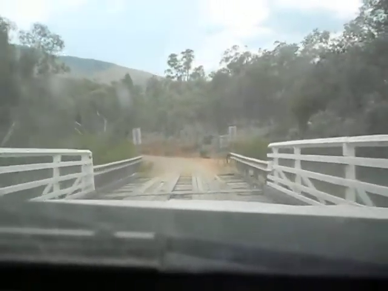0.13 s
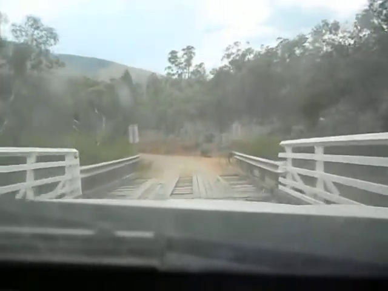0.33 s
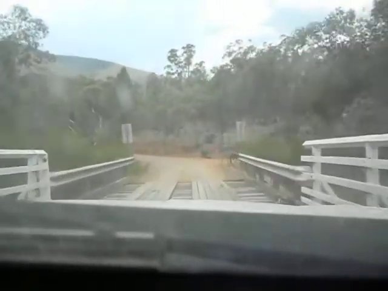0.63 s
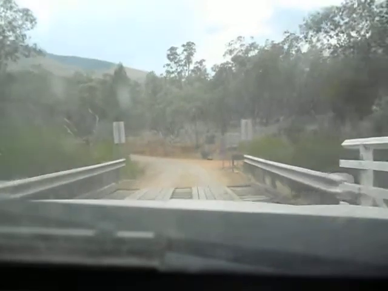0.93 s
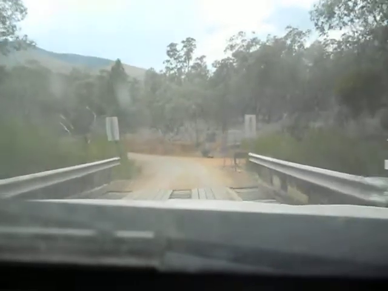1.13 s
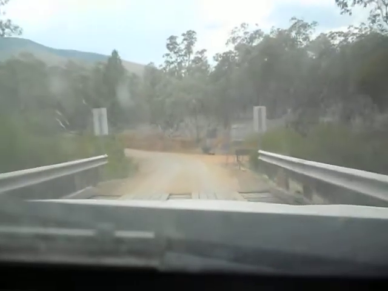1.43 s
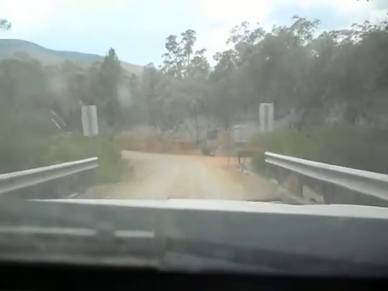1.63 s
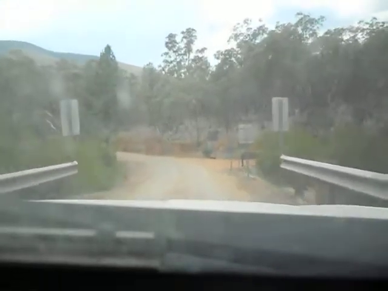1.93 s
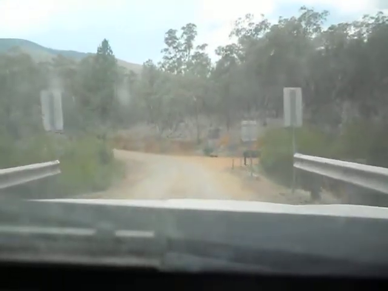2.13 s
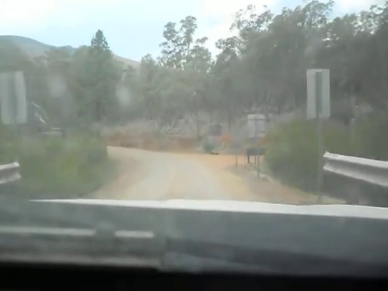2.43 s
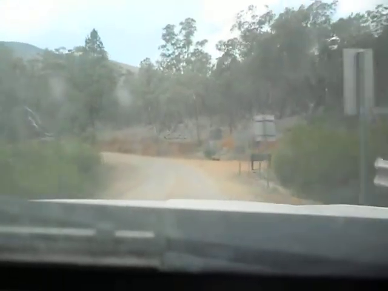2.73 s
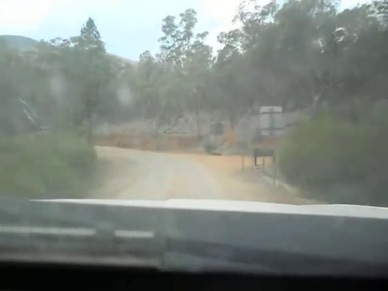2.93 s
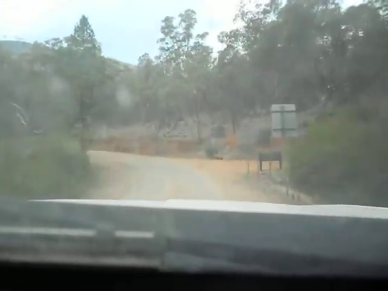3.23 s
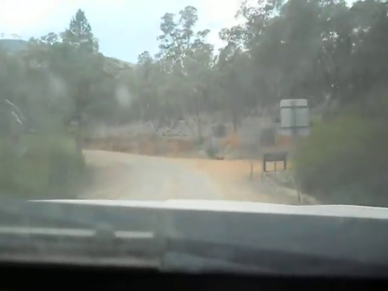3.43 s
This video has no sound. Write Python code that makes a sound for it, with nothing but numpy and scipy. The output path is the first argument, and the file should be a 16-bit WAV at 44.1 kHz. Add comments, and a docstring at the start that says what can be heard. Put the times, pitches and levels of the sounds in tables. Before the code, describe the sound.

Car tyres rumble dully across a wooden bridge above low engine hum and cabin boom. Two sharp plank clatters mark leaving it, then smoother dirt, a heavy jolt and jingling rattle, captured close inside the cabin.

```python
"""Tyres roar on the deck inside a car that rolls off a timber bridge onto a dirt road. Roar and grit are
filtered noise; the last planks crack, chatter and ring as decaying modes. Then a rut jolts the car: damped
thumps, and loose things rattle as contact runs and jingle as decaying sines. Beneath lie an engine hum of
firing harmonics and the slow boom of the cabin, two unsteady low sines."""
import sys
import numpy as np
from scipy import signal
from scipy.fft import rfft, irfft
from scipy.io import wavfile

SR = 44100
rng = np.random.default_rng(int(sys.argv[2]) if len(sys.argv) > 2 else 0)


def log_audio(samples):
    """Write samples as a 16-bit WAV file to the path given in sys.argv[1]."""
    # one column per channel
    frames = np.atleast_2d(samples).T
    # limit to full scale, then quantise
    limited = np.clip(frames, -1, 1)
    pcm = np.round(limited * 32767).astype(np.int16)
    wavfile.write(sys.argv[1], SR, pcm)


N = 157437
T = np.arange(N) / SR  # time, s

# All table levels are relative: each function may add its own trim.

# Tyre roar over time: time_s, level_db
ROAR_LEVEL = [(0, -21), (.15, -26), (.65, -24.5), (.95, -26.5), (1.35, -25.5), (1.72, -27), (1.92, -35),
              (2.12, -35), (2.42, -32), (2.58, -37), (2.82, -36.5), (2.92, -32), (3.0, -25), (3.1, -26),
              (3.2, -32.5), (3.3, -30.5), (3.57, -25.5)]
# Spectrum of the roar: frequency_hz, gain_db
ROAR_COLOUR = [(60, -14), (110, -3.5), (150, -12), (200, -14), (250, -11), (315, -12), (440, -20),
               (580, -19.5), (680, -23), (820, -21), (1030, -26.5), (1240, -26.5), (1550, -36.5),
               (3000, -44), (5000, -54.5), (10000, -70), (12000, -100)]
# Cabin resonances in the roar: frequency_hz, t60_s, level_db
ROAR_RESONANCES = [(184, 0.15, -5.5), (321, 0.085, -2), (477, 0.1, -6), (677.5, 0.086, -0.5),
                   (810.6, 0.087, -13.5), (1224, 0.077, -11.5)]
# Hiss of grit under the tyres over time: time_s, level_db
GRIT_LEVEL = [(0, -48.5), (.6, -49), (.95, -51.5), (1.45, -47.5), (1.8, -54.5), (2.05, -59.5), (2.4, -56),
              (2.88, -63), (2.97, -47), (3.2, -52), (3.35, -49), (3.43, -52.5), (3.57, -44.5)]
# Spectrum of the grit: frequency_hz, gain_db
GRIT_COLOUR = [(500, -21), (1500, 7), (3000, 8.5), (5500, 0), (8000, -2.5), (10200, -6), (10800, -50),
               (12000, -62)]
ROAR_RING_DB = -7.5
GRIT_PER_S, GRIT_SPREAD_DB = 9000, 2


def tyres(flutter_db=0.63, flutter_hz=40):
    """Broadband rolling noise: fluttering noise excites cabin resonances, and sparse impulses add grit."""
    roar = unit(colour(rng.standard_normal(N), ROAR_COLOUR))
    highpass = signal.butter(2, 120, "high", fs=SR, output="sos")
    roar = unit(signal.sosfilt(highpass, roar))
    resonance = ring(rng.standard_normal(N), ROAR_RESONANCES)
    roar = unit(roar + amp(ROAR_RING_DB) * resonance)
    roar_gain = amp(curve(ROAR_LEVEL) + flutter_db * wander(flutter_hz))

    # a few grains are much stronger than the rest
    grain_size = amp(GRIT_SPREAD_DB * np.minimum(rng.exponential(1, N), 4))
    grain_lands = rng.random(N) < GRIT_PER_S / SR
    grains = rng.standard_normal(N) * grain_size * grain_lands
    grit = unit(colour(grains, GRIT_COLOUR))
    return roar * roar_gain + grit * amp(curve(GRIT_LEVEL))


# Planks knocking under the wheels:
# start_s, chatter_db, chatter_length_s, brightness_db_per_octave, ring_db, crack_db
PLANK_KNOCKS = [(.249, -28.5, 0.12, -3.5, -33, -23), (.600, -19, 0.019, -3, -19, -12),
                (.609, -24, 0.011, -2.5, -20, -20), (1.179, -21.5, 0.029, -4.5, -21.5, -17),
                (1.506, -29, .006, -9, -31, -26), (1.5946, -16, .008, -4.5, -13.5, -5),
                (1.601, -11.5, 0.019, 1, -17, -3), (1.612, -13, 0.0071, -2.5, -37, -5.5),
                (1.619, -21, 0.0049, -6.5, -42, -7), (1.629, -38, 0.0091, -13, -24, -30),
                (1.656, -23, .018, 3.5, -41, -20), (1.732, -19.5, 0.026, 4.5, -20.5, -27),
                (1.764, -22.5, 0.023, 4, -17.5, -9), (1.783, -23, .017, 5, -25, -30),
                (2.184, -24, 0.0079, -3.5, -26, -23), (2.198, -15, 0.018, 0.5, -11.5, -13),
                (2.207, -28, 0.0095, 0.5, -9, -24), (2.223, -20, .011, -9, -20.5, -16),
                (2.246, -21, .009, -3.5, -27, -32), (2.258, -16.5, 0.0093, 2.5, -12.5, -11),
                (2.290, -23.5, 0.0072, 1, -18.5, -11), (2.344, -19.5, 0.018, 2.5, -33, -16),
                (2.361, -24, .008, 3.5, -22, -30), (2.380, -29, 0.045, 1, -19.5, -24)]
# Spectrum of a plank's crack and chatter: frequency_hz, gain_db
PLANK_COLOUR = [(70, -32), (150, -10), (250, -2.5), (400, 3), (560, 0.5), (820, -2.5), (1000, -0.5),
                (1300, -7), (1620, -11.5), (2150, -19.5), (2400, -22), (2720, -26), (3100, -29),
                (5000, -41), (10000, -51), (12000, -65)]
CHATTER_PER_S, CHATTER_FADE_S = 1300, 0.0067
DECK_T60_S, DECK_TAIL_DB = 0.35, -9.5


def planks():
    """Impact and modal response: each plank cracks down on its beam, chatters and sets the deck ringing."""
    knocks = np.zeros(N)
    for start, chatter_db, length, tilt, ring_db, crack_db in PLANK_KNOCKS:
        crack = colour(signal.unit_impulse(SR // 20), PLANK_COLOUR, tilt, tilt_top_hz=2600)
        add(knocks, start, amp(crack_db) * crack / np.abs(crack).max())
        run = contacts(length, CHATTER_PER_S, CHATTER_FADE_S)
        run = colour(run, PLANK_COLOUR, tilt, tilt_top_hz=2580)
        add(knocks, start, amp(chatter_db) * run)
        add(knocks, start, amp(ring_db) * deck_ring(tilt))
    return amp(-1) * (knocks + amp(DECK_TAIL_DB) * tail(knocks, DECK_T60_S))


# Ringing modes of the deck: frequency_hz, t60_s, level_db
DECK_MODES = [(262, 0.064, -14.5), (342, .07, -8.5), (408.7, .13, -7), (839, 0.059, -1),
              (1115, 0.039, -3.5), (1210, 0.036, -1.5), (1225, .05, -12), (1745, 0.082, -26),
              (1880, .09, -27), (2080, 0.029, -14), (2610, .12, -30), (3170, 0.097, -29)]
RING_RISE_S, RING_PIVOT_HZ = 0.0028, 1000


def deck_ring(tilt):
    """Modal superposition: one blow excites decaying sines, and its tilt in dB per octave weights them."""
    t = T[:SR // 4]
    tone = np.zeros(len(t))
    for hz, t60, db in DECK_MODES:
        gain = amp(db + tilt * np.log2(hz / RING_PIVOT_HZ))
        tone += gain * decay(t, t60) * np.sin(2 * np.pi * hz * t)
    return tone * np.minimum(t / RING_RISE_S, 1)


# Suspension thumps: start_s, level_db, pitch_hz, decay_s
THUMP_BLOWS = [(1.596, -10, 416.5, 0.004), (1.604, -24, 193, 0.019), (2.205, -16.5, 206, 0.013),
               (3.003, -12, 165, 0.012), (3.0264, -6.5, 400, 0.0048), (3.038, -19, 189, 0.032),
               (3.242, -26, 90, .03)]


def suspension():
    """Heavy damping: each blow to the body is a sine that dies along a Gaussian curve."""
    out = np.zeros(N)
    t = T[:SR // 5]
    for start, db, hz, decay_s in THUMP_BLOWS:
        add(out, start, amp(db) * np.sin(2 * np.pi * hz * t) * np.exp(-(t / decay_s) ** 2))
    return out


# Trim and small loose things clicking: start_s, level_db, length_s, brightness_db_per_octave
TICK_RUNS = [(.04, -43, 0.011, 12), (.63, -41.5, 0.025, 2), (.667, -24, 0.0022, 2.5),
             (.676, -28, 0.0018, 3), (.712, -34, 0.0031, 2), (1.062, -31.5, 0.0014, 0),
             (1.607, -46, .002, -3), (1.613, -45, .001, 3), (1.768, -29.5, 0.0058, 1),
             (2.21, -40, 0.0073, 4), (2.266, -36, 0.018, 0), (2.605, -45.5, 0.0091, 2),
             (2.683, -43, 0.0042, 1), (2.722, -46.5, 0.007, 4), (2.836, -46, 0.02, 2),
             (3.012, -34, 0.0044, -1), (3.036, -38, 0.056, 3.5), (3.066, -37.5, 0.016, 14),
             (3.095, -28, 0.03, 1.5), (3.13, -34, 0.038, 0.5), (3.173, -35.5, 0.015, 5),
             (3.243, -54, .01, 7), (3.362, -43.5, 0.011, 9)]
# Spectrum of the clicks: frequency_hz, gain_db
TICK_COLOUR = [(500, -40), (2000, 18.5), (3200, 13.5), (5500, 8), (8000, 6.5), (10000, -0.5), (11500, -15)]
# Trim creaking: start_s, level_db, length_s, brightness_db_per_octave
CREAK_RUNS = [(1.262, -32, 0.022, -3.5), (1.405, -46, 0.015, 8), (2.176, -36.5, 0.021, -5),
              (2.626, -36.5, 0.012, -3), (3.325, -34, 0.023, -6)]
# Spectrum of the creaks: frequency_hz, gain_db
CREAK_COLOUR = [(800, -2.5), (2200, 0.5), (3500, -7), (5100, 4), (6500, -4), (7800, -5), (10000, -22)]
# Gravel and loose things scraping at the rut: start_s, level_db, length_s, brightness_db_per_octave
SCRAPE_RUNS = [(2.895, -27, 0.0088, -4), (2.947, -36.5, 0.026, -1), (3.026, -16, 0.02, -8),
               (3.064, -26, 0.023, 1.5), (3.090, -19, 0.0075, -0.5), (3.099, -15.5, .008, -2),
               (3.116, -21, .012, -1), (3.133, -18, 0.01, -0.5), (3.141, -18, 0.0068, -6),
               (3.153, -27.5, .022, -6.5), (3.238, -24, 0.012, -4)]
# Spectrum of the scrapes: frequency_hz, gain_db
SCRAPE_COLOUR = [(150, -11.5), (450, -5), (800, 4), (1000, 2.5), (1250, -3.5), (1520, -4), (1900, -11.5),
                 (3000, -12.5), (5000, -13.5), (7500, -27), (10000, -45)]
# Ringing modes of the scraping things: frequency_hz, t60_s, level_db
SCRAPE_RESONANCES = [(768, 0.065, -9.5), (1228, 0.11, 2), (1489, 0.12, -5), (2226, 0.051, 2),
                     (2750, 0.12, -3.5)]
# Loose metal jingling at the rut: start_s, level_db
JINGLE_STRIKES = [(3.037, -43), (3.065, -32), (3.096, -44), (3.175, -46), (3.215, -49)]
# Ringing modes of the loose metal: frequency_hz, t60_s, level_db
METAL_MODES = [(4140, .2, -13), (4976, 0.13, -1), (5400, 0.18, -5), (7800, 0.1, -3), (7900, .05, 4)]
SCRAPE_RING_DB, JINGLE_WAVER_HZ = -14.5, 30
CABIN_T60_S, CABIN_TAIL_DB = 0.3, -8.5


def loose_things():
    """Repeated contact and modal ringing: clicks, creaks, scrapes and jingles with a diffuse cabin tail."""
    ticks = chatter(TICK_RUNS, TICK_COLOUR, per_s=1500, fade_s=0.0018)
    creaks = chatter(CREAK_RUNS, CREAK_COLOUR, per_s=2400, fade_s=0.0057)
    scrapes = chatter(SCRAPE_RUNS, SCRAPE_COLOUR, per_s=450, fade_s=0.0097)
    scrapes = scrapes + amp(SCRAPE_RING_DB) * ring(scrapes, SCRAPE_RESONANCES)
    near = ticks + creaks + scrapes
    t = T[:SR // 2]
    for start, db in JINGLE_STRIKES:
        for hz, t60, mode_db in METAL_MODES:
            waver = JINGLE_WAVER_HZ * np.cumsum(wander(45)[:len(t)]) / SR
            cycles = hz * t + waver + rng.random()
            add(near, start, amp(db + mode_db) * decay(t, t60) * np.sin(2 * np.pi * cycles))
    return amp(-2.5) * (near + amp(CABIN_TAIL_DB) * tail(near, CABIN_T60_S))


# Engine hum over time: time_s, second_harmonic_hz, level_db
HUM_COURSE = [(0, 149.4, -25.5), (.17, 148.8, -27.5), (.225, 148.3, -35), (.29, 144.5, -25.5),
              (.37, 146.1, -30), (.55, 145.3, -26.5), (1.1, 141.3, -23.5), (1.23, 140.7, -28),
              (1.3, 141.2, -25), (1.59, 138.3, -25), (1.63, 137.5, -34.5), (2.0, 136.9, -37.5),
              (2.6, 135.5, -41), (2.95, 142, -38), (3.57, 144.3, -45)]
# Engine harmonics: multiple_of_firing_rate, level_db
FIRING_HARMONICS = [(1, -8.5), (2, -2), (3, -22)]


def engine(waver_db=1, wobble_hz=7, steady_s=.6):
    """Harmonic series: firing harmonics wobble at first, then steady, and fade as the throttle lifts."""
    wobble = wobble_hz * wander(14.55) * np.exp(-(T / steady_s) ** 2)
    # pi, not 2 pi: the table gives the second harmonic
    phase = np.pi * np.cumsum(curve(HUM_COURSE) + wobble) / SR
    tone = np.zeros(N)
    for multiple, db in FIRING_HARMONICS:
        tone += amp(db + waver_db * wander(16)) * np.sin(round(multiple) * phase)
    return np.sqrt(2) * tone * amp(curve(HUM_COURSE, axis=2))


# Shaking of the body over time: time_s, slow_boom_db, fast_boom_db, rumble_db
BODY_SHAKE = [(0, -23.5, -28, -23), (.16, -10.5, -20, -26.5), (.26, -28, -33.5, -32),
              (.42, -18.5, -18.5, -28.5), (.6, -28.5, -24.5, -27), (.73, -13, -23, -28.5),
              (.9, -29.5, -23.5, -30), (1.08, -19, -23.5, -27), (1.33, -30, -19.5, -33.5),
              (1.52, -26.5, -31, -36), (1.82, -21.5, -22.5, -32), (2.02, -36, -41, -44),
              (2.23, -34.5, -37, -30), (2.33, -25, -31, -36.5), (2.6, -28, -51, -41.5),
              (2.88, -32.5, -38, -40), (3.0, -22, -24.5, -24.5), (3.38, -36, -31, -33),
              (3.55, -14.5, -26, -29)]
# Cabin boom, slow then fast: frequency_hz, waver_hz
BOOM_MODES = [(22, 3.22), (33, 3.55)]
# Spectrum of the rumble: frequency_hz, gain_db
RUMBLE_COLOUR = [(20, -16), (36, 7), (48, 12), (60, 19), (75, 33.5), (92, 0.5), (115, 1), (140, -18),
                 (220, -39)]


def cabin(boom_db=1, rumble_db=-1):
    """Low-frequency resonance: the shaken body booms in two unsteady modes, with a noise rumble above."""
    boom = np.zeros(N)
    for k, (hz, waver) in enumerate(BOOM_MODES):
        phase = 2 * np.pi * np.cumsum(hz + waver * wander(5.85)) / SR
        boom += amp(curve(BODY_SHAKE, axis=k + 1)) * np.sin(phase)
    rumble = unit(colour(rng.standard_normal(N), RUMBLE_COLOUR))
    rumble = rumble * amp(curve(BODY_SHAKE, axis=3) + rumble_db)
    return np.sqrt(2) * amp(boom_db) * boom + rumble


SETTLE_DB = 5  # the contacts weaken by this much over a run
UNEVEN_DB = 3  # spread of the contacts, either way
ATTACK_S = 0.0022  # longest build-up of a run


def contacts(length, per_s, fade_s):
    """Repeated impact: a quick run of uneven contacts of either sign builds, settles and dies away."""
    t = T[:SR // 5]
    count = int(per_s / 5)
    place, sign, size = rng.random((count, 3)).T
    # one contact at a random place in each equal time slot
    at = np.minimum((np.arange(count) + place) * SR / per_s, len(t) - 1).astype(int)
    hits = np.zeros(len(t))
    hits[at] = np.sign(sign - .5) * amp(UNEVEN_DB * (2 * size - 1)) * np.sqrt(SR / per_s)
    build = np.minimum(t / min(ATTACK_S, length / 2), 1)
    settle = amp(-SETTLE_DB * np.minimum(t / length, 1))
    fade = np.exp(-np.maximum(t - length, 0) / fade_s)
    return hits * build * settle * fade


def chatter(rows, spectrum, per_s, fade_s):
    """Source and filter: plays a table of contact runs through one object's colour."""
    out = np.zeros(N)
    for start, db, length, tilt in rows:
        run = contacts(length, per_s, fade_s)
        add(out, start, amp(db) * colour(run, spectrum, tilt))
    return out


def ring(x, modes):
    """Modal convolution: excites decaying modes of alternating sign, with unit filter energy."""
    t = T[:SR // 2]
    taps = np.zeros(len(t))
    for k, (hz, t60, db) in enumerate(modes):
        gain = (-1) ** k * amp(db) / np.sqrt(t60)
        taps += gain * decay(t, t60) * np.cos(2 * np.pi * hz * t)
    taps = taps * np.minimum(t / 0.0015, 1)
    return signal.fftconvolve(x, taps / np.linalg.norm(taps))[:N]


def tail(x, t60):
    """Diffuse reverberation: convolves with decaying noise of unit energy."""
    t = T[:SR // 2]
    taps = rng.standard_normal(len(t)) * decay(t, t60) * np.minimum(t / 0.0039, 1)
    return signal.fftconvolve(x, taps / np.linalg.norm(taps))[:N]


def decay(t, t60):
    """Exponential decay: the envelope falls 60 dB in t60 seconds."""
    return np.exp(-np.log(1000) * t / t60)


def colour(x, points, tilt=0, tilt_top_hz=11000):
    """Minimum-phase filter of unit energy through (Hz, dB) points, tilted in dB per octave."""
    size = 4096
    octave = np.log2(np.abs(np.fft.fftfreq(size, 1 / SR)) + 1)
    hz, db = np.transpose(points)
    tilt_db = tilt * np.clip(octave, np.log2(hz[0]), np.log2(tilt_top_hz))
    log_gain = np.log(amp(np.interp(octave, np.log2(hz), db) + tilt_db))
    # the Hilbert transform of the log gain gives the phase of a causal filter
    response = np.exp(np.conj(signal.hilbert(log_gain)))
    taps = np.fft.ifft(response).real[:size // 2]
    return signal.fftconvolve(x, taps / np.linalg.norm(taps))[:len(x)]


def wander(hz):
    """Band-limited random motion: noise under a Gaussian low-pass of width hz, scaled to rms 1."""
    f = np.fft.rfftfreq(N, 1 / SR)
    return unit(irfft(rfft(rng.standard_normal(N)) * np.exp(-(f / hz) ** 2), N))


def curve(rows, axis=1):
    """Linear interpolation: one column of a timed table at every sample."""
    rows = np.array(rows)
    return np.interp(T, rows[:, 0], rows[:, axis])


def add(mix, start, sound):
    """Superposition: mixes a sound in place at a start time in seconds."""
    part = mix[max(round(start * SR), 0):][:len(sound)]
    part += sound[:len(part)]


def amp(db):
    """Logarithmic level: decibels to amplitude gain."""
    return 10 ** (np.asarray(db) / 20)


def unit(x):
    """Power normalisation: scales to rms 1."""
    return x / np.sqrt(np.mean(x ** 2) + 1e-20)


def scene():
    """Superposition of everything heard from behind the windscreen, as one channel."""
    road = tyres() + planks() + suspension()
    car = loose_things() + engine() + cabin()
    return (road + car)[None]


CUTOFF_HZ = 11500


def record(dry):
    """Band limiting: a linear-phase low-pass removes the highest treble."""
    taps = signal.firwin(81, CUTOFF_HZ, window=("kaiser", 8), fs=SR)
    return signal.oaconvolve(dry, taps[None], "same")


dry = scene()
out = record(dry)
log_audio(out)
```